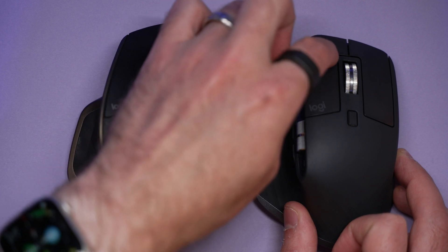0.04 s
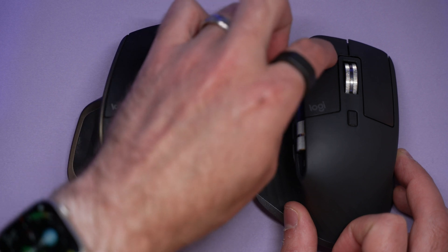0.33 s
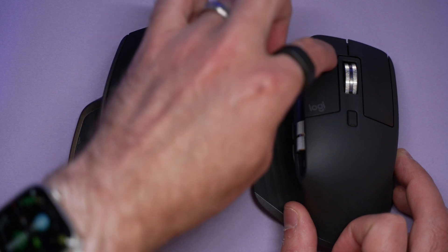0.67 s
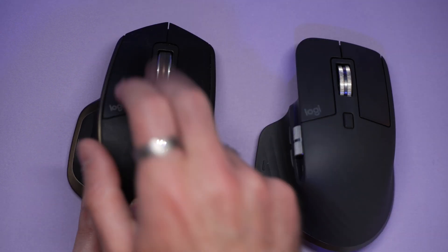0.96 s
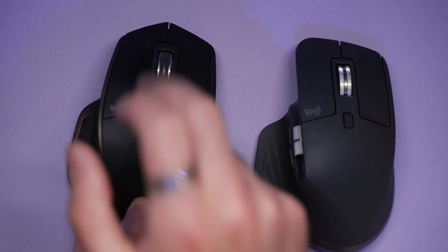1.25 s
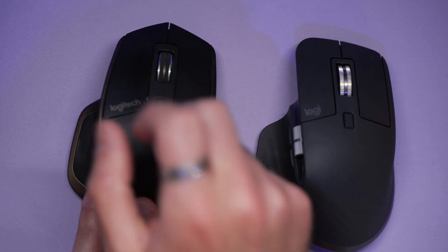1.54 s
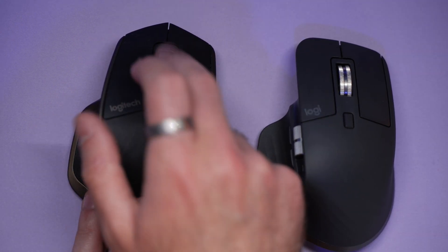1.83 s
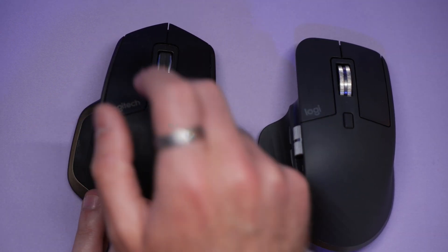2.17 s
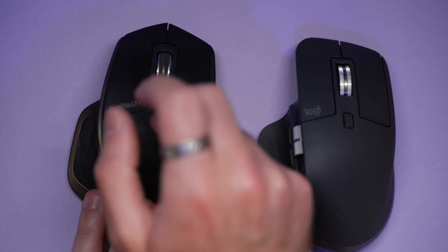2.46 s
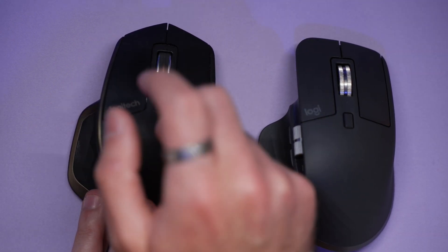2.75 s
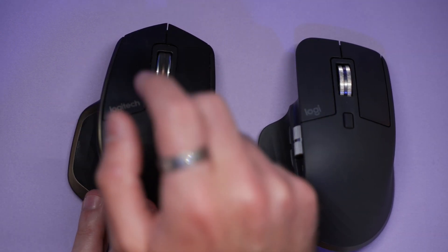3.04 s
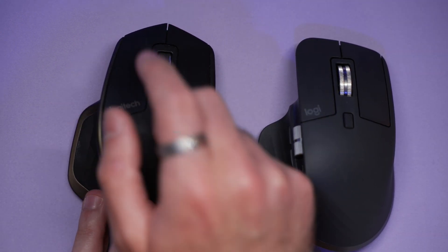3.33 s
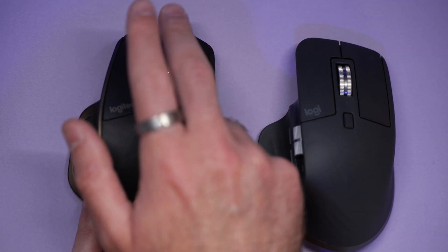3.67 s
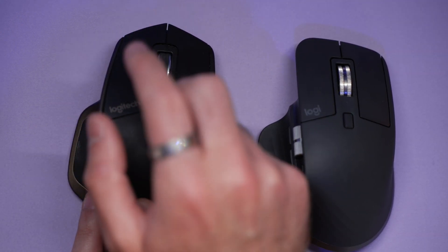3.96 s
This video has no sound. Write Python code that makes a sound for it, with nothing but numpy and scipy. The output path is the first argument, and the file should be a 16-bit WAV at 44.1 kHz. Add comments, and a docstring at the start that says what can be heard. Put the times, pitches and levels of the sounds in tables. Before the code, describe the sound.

A computer mouse scroll wheel whirrs in quick ratcheting bursts after a few button clicks.

```python
"""A desk in a quiet room, with two computer mice heard from close by. A button is clicked six times,
down and up, each contact exciting its damped modes. Then a finger flicks a notched scroll wheel ten
times: the ratchet speeds up to a whirr and slows to single ticks as friction and drag brake the wheel.
Every tick rings the plastic shell, the fingertip squeaks on the metal rim and the hand thumps the desk.
Short reflections and a faint, low room noise lie behind."""
import sys
import numpy as np
from scipy import signal
from scipy.fft import rfft, irfft, next_fast_len
from scipy.io import wavfile

SR = 44100
rng = np.random.default_rng(int(sys.argv[2]) if len(sys.argv) > 2 else 0)


def waveform_to_disk(signal):
    """Save audio, clipped to [-1, 1], as 16-bit WAV at the path in sys.argv[1]."""
    frames = np.transpose(np.atleast_2d(signal))
    scaled = np.clip(frames, -1, 1) * 32767
    samples = np.round(scaled).astype(np.int16)
    wavfile.write(sys.argv[1], SR, samples)


N = 176400


def wheel():
    """Impact excitation: each notch rings body and shell, and a harder blow sounds brighter."""
    # flicks: first tick t/s, release t/s, last tick t/s, first rate f/Hz, last rate f/Hz,
    # friction/(Hz/s), level/dB, slip-off accent/dB
    flicks = [(1.001, 1.033, 1.2723, 105.6, 30.13, 946, -1, 7.5),
              (1.5261, 1.562, 1.8043, 116.4, 35.1, 952.3, -0.5, 7.5),
              (1.8875, 1.922, 2.1253, 113.8, 60.16, 1028, -1, 4),
              (2.1674, 2.207, 2.387, 98, 57.13, 1027, -0.5, 3),
              (2.4121, 2.475, 2.6518, 110.7, 54.26, 914, -0.5, 0),
              (2.714, 2.751, 2.9463, 149, 51.25, 934.7, -1, 4.5),
              (2.9702, 3.022, 3.2408, 89.5, 37.42, 937.6, -1, 5),
              (3.3028, 3.369, 3.5823, 60.1, 28.5, 981, 0, 1),
              (3.641, 3.659, 3.8333, 187, 49.73, 831, -2, -0.5),
              (3.9206, 3.953, 4.18, 150.6, 39.93, 946, -2.5, 3)]
    notches = [(1.306, -13), (1.328, -15.5), (1.342, -20.5), (1.505, -18), (1.846, -19), (1.856, -31),
               (1.870, -12.5), (2.142, -5.5), (2.153, -8), (2.677, -19), (2.700, -14), (3.284, -10),
               (3.623, -10.5), (3.631, -9), (3.882, -9), (3.902, -6)]  # lone ticks as the wheel settles or the finger finds it: t/s, level/dB
    shell_modes = [(588, 45, 8.5), (768, 31.6, 17.5), (825, 21, 11), (868, 31, 13.5), (1186, 190, 7.5),
                   (1320.4, 69, 13), (1500, 18, 4), (1800, 140, 5), (2325, 75, 0), (2640, 80, 3.5),
                   (3318, 194, 7), (3805, 190, 5), (4820, 240, 7.5), (6030, 110, 7), (6610, 93, 4.5),
                   (10430, 267, 10.5)]  # shell resonances: f/Hz, bandwidth/Hz, lift/dB
    body_modes = [(198.2, -54.5, 0.25), (238.2, -58, 0.26), (308, -64.5, 0.14)]  # modes of the mouse body on the desk: f/Hz, level/dB, T60/s
    chatter_spectrum = [(200, -31.5), (450, -18.5), (750, -8), (1000, -9), (1300, -9.5), (1800, -9.5),
                        (2400, -9), (3300, -5.5), (4400, -10), (5500, -9.5), (7500, -16), (10000, -25.5),
                        (11300, -29), (13000, -30), (16000, -38)]  # the pawl's bright chatter through the shell: f/Hz, level/dB
    clatter_spectrum = [(200, -40.5), (450, -14.5), (750, -6.5), (1000, -5.5), (1300, -5), (2000, -5),
                        (3300, -11.5), (4400, -17), (7000, -25.5), (16000, -45.5)]  # the duller shell clatter that follows: f/Hz, level/dB
    sizzle_spectrum = [(1000, -47), (2500, -9.5), (3400, -5.5), (5000, -7.5), (7500, -12), (10000, -13.5),
                       (11300, -16.5), (13000, -11), (16000, -26)]  # treble of hard ticks: f/Hz, level/dB
    scuff_spectrum = [(500, -28), (2000, -13.5), (4200, -4), (8000, -5.5), (14000, -5.5), (16000, -23)]  # fingertip on the ridged wheel: f/Hz, level/dB
    jitter_s, scatter_db = 0.00012, 1.17
    attack_s, chatter_decay_s, scuff_decay_s = 0.00024, 0.0023, 0.0041
    knocks, chatter, clatter, sizzle, scuff = np.zeros((5, N))
    for s, db in np.vstack([flick(*row) for row in flicks] + [notches]):
        s += jitter_s * rng.standard_normal()
        gain = amp(db + scatter_db * rng.standard_normal())
        add(knocks, s, [gain])
        add(chatter, s, gain * burst(attack_s, chatter_decay_s))
        # Soft ticks are mostly clatter; the sizzle grows faster than the tick itself.
        add(clatter, s, gain ** 0.67 * burst(attack_s=0.0019, decay_s=0.0053))
        add(sizzle, s, min(gain, gain ** 2.9) * burst(attack_s, chatter_decay_s))
        pushed = any(first - scuff_decay_s < s < release for first, release, *_ in flicks)
        add(scuff, s, pushed * np.sqrt(gain) * burst(attack_s, scuff_decay_s))
    crack = 0.2 * knocks  # crisp first contact
    shell = (amp(-4.5) * coloured(chatter + crack, chatter_spectrum, shell_modes)
             + amp(-7) * coloured(clatter, clatter_spectrum, shell_modes)
             + amp(-7.5) * coloured(sizzle, sizzle_spectrum, shell_modes))
    body = signal.fftconvolve(knocks, ring(body_modes))[:N]
    return shell + body + amp(-16) * coloured(scuff, scuff_spectrum) + axle(knocks)


def flick(first, release, last, first_hz, last_hz, friction, db, accent_db):
    """Driven, then damped rotation: a push, then dry friction and drag. Gives ticks as t/s, level/dB."""
    drag_per_s, accent_s = 2.4, 0.017
    db_per_octave, reference_hz, stall_hz = 3, 208, 40.12
    fraction = np.linspace(0, 1, 400)
    # The coast is traced backwards from the last tick.
    left_s = fraction * (last - release)
    friction_hz = friction / drag_per_s
    coast_hz = (last_hz + friction_hz) * np.exp(drag_per_s * left_s) - friction_hz
    notches_left = (coast_hz - last_hz - friction * left_s) / drag_per_s
    before_last_s = np.interp(np.arange(notches_left[-1]), notches_left, left_s)
    # The push brings the wheel to the rate at which the coast begins.
    push_hz = first_hz + (coast_hz[-1] - first_hz) * fraction ** 2
    notches_passed = np.cumsum(push_hz) * (release - first) / len(fraction)
    progress = np.interp(np.arange(notches_passed[-1] - 0.5), notches_passed, fraction)
    times = np.r_[first + progress * (release - first), last - before_last_s]
    rate = np.r_[np.interp(progress, fraction, push_hz), np.interp(before_last_s, left_s, coast_hz)]
    level = db + db_per_octave * np.log2(rate / reference_hz)
    level -= 0.5 * np.maximum(0, 1 - rate / stall_hz)  # a slow wheel barely tips over its notch
    level[:len(progress)] -= 5.5 * (1 - progress)  # the finger damps the first ticks
    level += accent_db * np.exp(-np.abs(times - release) / accent_s)  # the finger slips off
    level[0] += 3.5  # the landing finger strikes the first notch
    return np.c_[times, level]


def button():
    """Free vibration after impact: a cushioned thock, with a snap and a lid rattle on hard landings."""
    clicks = [(.1040, -33, -36.5), (.1818, -42.5, -58), (.2540, -37.5, -54.5), (.3082, -41.5, -71),
              (0.3213, -50, -54.5), (.3850, -33.5, -30), (0.407, -67, -49), (.4490, -62, -52),
              (.4560, -41.5, -55), (0.4655, -51, -48), (0.5379, -35.5, -28.5), (0.5415, -35, -24),
              (.5535, -50, -52), (0.602, -45, -32.5), (0.6819, -36.5, -27), (0.696, -50, -35),
              (0.7493, -40.5, -33.5), (0.8146, -36, -25.5), (.8200, -39, -33), (.8900, -41, -53),
              (.8952, -53.5, -43.5)]  # contacts down, up and rebounding: t/s, thock level/dB, snap level/dB
    button_modes = [(653, -2.5, 0.038), (733, -5, 0.025), (840, -6.5, .02), (1036, -13, 0.038),
                    (1373, -16, 0.055), (2380, -21.5, 0.026)]  # modes of the button: f/Hz, level/dB, T60/s
    snap_spectrum = [(300, -22.5), (550, -1.5), (900, 0.5), (1600, -6.5), (2250, -0.5), (2900, -10.5),
                     (3500, -1), (4300, -13), (5100, -5), (7500, -8.5), (11000, -19.5), (13000, -16.5),
                     (16000, -28)]  # snap of the plastic: f/Hz, level/dB
    lid_spectrum = [(400, -14.5), (750, -3), (1000, 3), (1400, -6), (1800, -5.5), (2300, 2.5),
                    (2900, -13.5), (3500, -10), (6000, -20.5), (14000, -40.5)]  # the lid rattling on after a snap: f/Hz, level/dB
    thocks, snaps, lid = np.zeros((3, N))
    for s, thock_db, snap_db in clicks:
        add(thocks, s, amp(thock_db) * ring(button_modes))
        add(snaps, s, amp(snap_db + 20) * burst(attack_s=0.00054, decay_s=0.0026))
        add(lid, s, amp(snap_db + 22.5) * burst(attack_s=0.002, decay_s=0.0035))
    low_cut = signal.butter(6, 580, "high", fs=SR, output="sos")
    return signal.sosfilt(low_cut, thocks) + coloured(snaps, snap_spectrum) + coloured(lid, lid_spectrum)


def fingertip():
    """Friction noise: skin catches the wheel's metal rim in short, high squeaks."""
    squeaks = [(2.421, -7), (2.438, -16), (2.97, -4), (2.987, -17), (3.318, -10)]  # catches on the rim: t/s, level/dB
    squeak_spectrum = [(2000, -48), (7000, -17), (8400, -8), (10000, -26), (12200, -11), (14000, -11),
                       (15000, -28), (16000, -35)]  # skin on metal: f/Hz, level/dB
    slips = np.zeros(N)
    for s, db in squeaks:
        add(slips, s, amp(db) * burst(attack_s=0.002, decay_s=0.0031))
    return coloured(slips, squeak_spectrum)


def desk():
    """Soft impact: the hand's weight arrives gradually, so the desk answers with a dull thump."""
    thumps = [(.104, -52), (.385, -48.5), (0.538, -40.5), (0.683, -42.5), (.815, -40), (1.02, -48),
              (1.56, -47), (1.915, -41), (2.154, -35.5), (2.415, -37), (2.695, -38.5), (2.964, -40),
              (3.305, -38.5), (3.63, -49.5), (3.90, -43)]  # landings of the hand: t/s, level/dB
    desk_spectrum = [(15, -16), (30, -7), (55, 7.5), (85, -7.5), (150, -5), (250, -8), (500, -58)]  # response of the desk: f/Hz, level/dB
    t = np.arange(SR // 4) / SR
    push = np.zeros(N)
    for s, db in thumps:
        add(push, s, amp(db) * envelope(t, attack_s=0.0066, decay_s=0.033))
    return push * noise(desk_spectrum)


def axle(knocks):
    """Bearing noise: the spinning axle rumbles with a power that follows the recent ticks."""
    rumble_spectrum = [(20, -2.5), (35, -0.5), (70, -10), (130, -10.5), (250, -4.5), (450, -14),
                       (900, -43.5)]  # rumble of the axle: f/Hz, level/dB
    lag_s = 0.052
    power = signal.lfilter([1], [1, -np.exp(-1 / (lag_s * SR))], knocks)
    return amp(-54.5) * unit(np.sqrt(power)) * noise(rumble_spectrum)


def reflections(direct):
    """Reverberation: brief echoes off nearby surfaces and a fainter, longer tail from the room."""
    near_decay = [(200, 0.046), (1000, 0.028), (2500, 0.029), (5000, 0.016), (14000, .012)]  # echoes off hand and desk: f/Hz, T60/s
    room_decay = [(200, .22), (1000, 0.25), (4000, .15), (14000, 0.027)]  # reverberation of the room: f/Hz, T60/s
    return amp(-10) * echoes(direct, near_decay) + amp(-19.5) * echoes(direct, room_decay)


def echoes(x, decay):
    """Diffuse echoes: each frequency dies at its own rate."""
    wet, block = np.zeros(N), SR // 12
    for i in range(0, N, block):  # a fresh random tail per block keeps the colour even
        hz, t, bands = signal.stft(rng.standard_normal(SR // 5), SR, nperseg=128)
        fade = np.exp(-np.log(1000) * t / along(decay, hz)[:, None])
        _, tail = signal.istft(bands * fade, SR)
        add(wet, i / SR, signal.fftconvolve(x[i:i + block], tail / np.linalg.norm(tail)))
    return wet


def room_air():
    """Ambient noise: a faint, steady background, strongest in the bass."""
    air_spectrum = [(12, -33.5), (20, -1.5), (65, -5.5), (113, -12.5), (310, -20.5), (459, -19),
                    (513, -20.5), (1610, -38), (6910, -47.5), (8650, -47.5), (16000, -52)]  # noise floor of the room: f/Hz, level/dB
    return amp(-60) * noise(air_spectrum)


def amp(db):
    """Amplitude ratio of a level in decibels."""
    return 10 ** (np.asarray(db) / 20)


def unit(x):
    """Normalisation to rms 1."""
    return x / np.sqrt(np.mean(x ** 2) + 1e-20)


def along(points, hz):
    """Interpolation of (f/Hz, value) points on a logarithmic frequency axis."""
    f, values = np.transpose(points)
    return np.interp(np.log(hz + 1), np.log(f + 1), values)


def add(track, s, sound):
    """Superposition of a sound on a track, starting at s seconds."""
    i = max(0, round(s * SR))
    if i < N:
        track[i:i + len(sound)] += sound[:N - i]


def coloured(x, points, modes=()):
    """Minimum-phase filtering: a broad spectrum with ringing resonances on top."""
    size = 2 * next_fast_len(N // 2 + SR // 4)
    hz = np.fft.rfftfreq(size, 1 / SR)
    lift = sum((amp(db) ** 2 - 1) / (1 + (2 * (hz - f) / width) ** 2) for f, width, db in modes)
    log_gain = np.log(amp(along(points, hz))) + np.log(np.abs(1 + lift)) / 2
    cepstrum = irfft(log_gain)
    cepstrum[1:size // 2] *= 2  # folding onto positive time makes the filter causal
    cepstrum[size // 2 + 1:] = 0
    return irfft(rfft(x, size) * np.exp(rfft(cepstrum)))[:N]


def noise(points):
    """Spectral shaping of white noise, at rms 1."""
    return unit(coloured(rng.standard_normal(N), points))


def ring(modes):
    """Modal impulse response: a sum of damped sines."""
    t = np.arange(SR // 5) / SR
    return sum(amp(db) * np.exp(-np.log(1000) * t / t60) * np.sin(2 * np.pi * hz * t)
               for hz, db, t60 in modes)


def envelope(t, attack_s, decay_s):
    """Exponential rise and decay, each with its time constant."""
    return (1 - np.exp(-t / attack_s)) * np.exp(-t / decay_s)


def burst(attack_s, decay_s):
    """Noise transient: a short dying rattle of unit energy."""
    t = np.arange(1, SR // 30) / SR
    rattle = rng.standard_normal(len(t)) * envelope(t, attack_s, decay_s)
    return rattle / np.linalg.norm(rattle)


def scene():
    """Superposition of the mice, their reflections, the desk and the room air in one channel."""
    mice = wheel() + fingertip() + button()
    return (mice + reflections(mice) + desk() + room_air())[None]


def record(dry):
    """Band limiting: an ideal low-pass filter removes the highest treble."""
    top_hz = 16100
    size = next_fast_len(N + SR // 2)
    passband = np.fft.rfftfreq(size, 1 / SR) < top_hz
    return irfft(rfft(dry, size) * passband, size)[:, :N]


dry = scene()
out = record(dry)
waveform_to_disk(out)
```